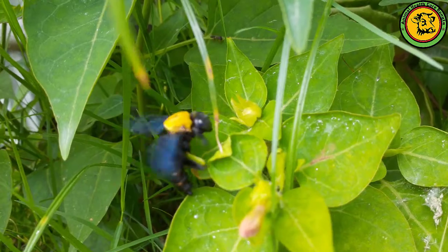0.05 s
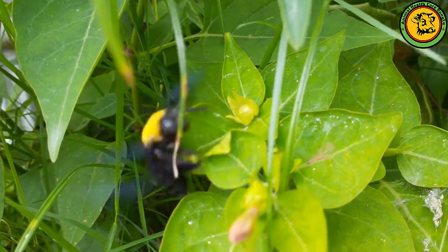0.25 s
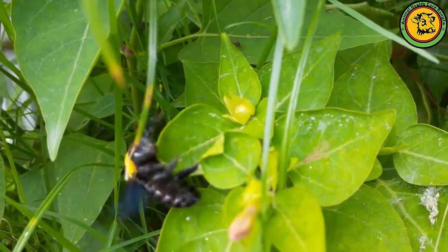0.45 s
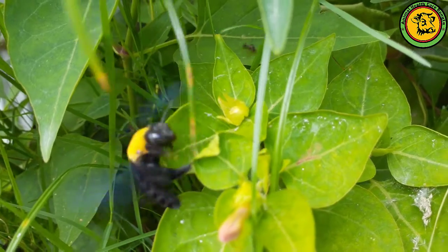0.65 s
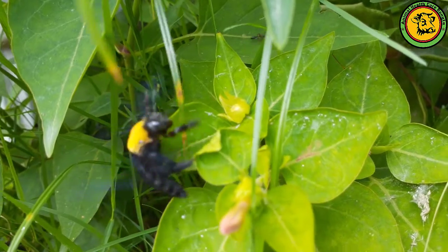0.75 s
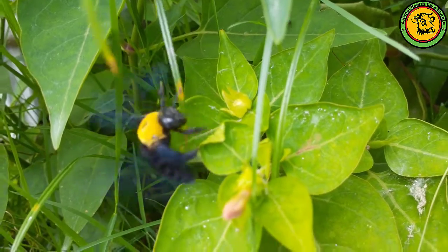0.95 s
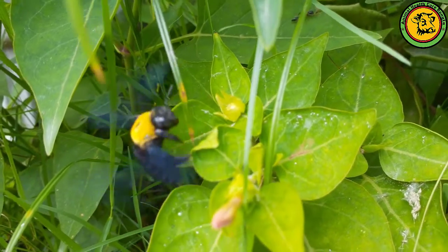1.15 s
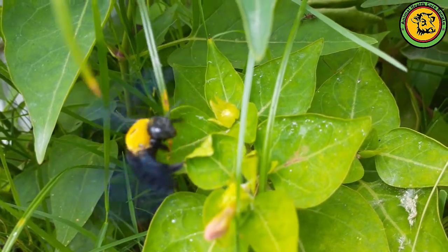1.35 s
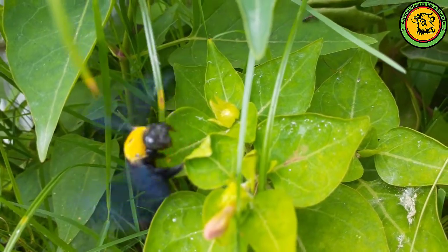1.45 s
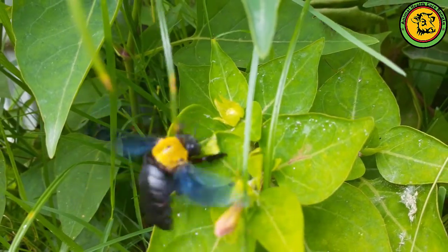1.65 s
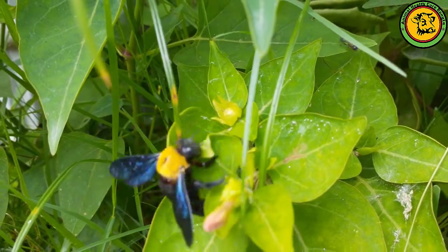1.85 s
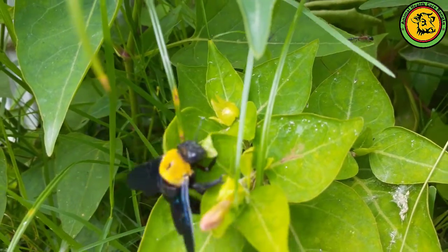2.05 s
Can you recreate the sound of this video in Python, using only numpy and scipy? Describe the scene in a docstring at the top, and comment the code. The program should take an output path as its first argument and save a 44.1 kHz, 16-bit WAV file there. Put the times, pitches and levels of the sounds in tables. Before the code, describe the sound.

Low, raspy buzzing of a big bee among leaves, ending abruptly, with faint distant birdsong.

```python
"""Faint outdoor air and a thin insect hiss run throughout; a far bird repeats a two-part call for 1 s,
the first with a soft raspy burst. At 0.17 s a large bee, very close, starts beating its wings.
Each wingbeat gives a low, reedy hum and dry rasps. The wing tips clatter against a leaf,
lightly at first, harder near 0.7 s and 1.75 s. At 1.85 s the bee settles; one tiny tick follows."""
import sys
import numpy as np
from scipy import signal
from scipy.fft import rfft, irfft
from scipy.io import wavfile

SR = 44100
rng = np.random.default_rng(int(sys.argv[2]) if len(sys.argv) > 2 else 0)


def pcm_store(signal):
    """Save signal as 16-bit PCM."""
    levels = np.round(np.clip(np.atleast_2d(signal), -1, 1) * 32767)
    wavfile.write(sys.argv[1], SR, levels.astype(np.int16).T)


N = 92610
T = np.arange(N) / SR
EDGE_HZ = 15750
STEADY_HZ = 93.35  # a slower beat stumbles and loses overtones
FLIP_CYCLES = 0.24  # place of the wing flip in the beat

# wingbeat: (time [s], rate [Hz])
BEAT = [(.19,83.4),(.25,87.6),(.335,94.7),(.39,95.6),(.445,98.7),(.5,102.1),(.57,89.6),(.64,95.7),(.72,95.4),(.88,98.8),(1.02,96.8),(1.23,99.4),(1.3,96.1),(1.56,97),(1.65,91.7),(1.725,99.3),(1.775,86.5),(1.84,87.9)]
# hum: (time [s], level of harmonics 1-3 [dB], level of the overtones above [dB])
HUM = [(.19,-45.5,-51),(.226,-36,-38.5),(.27,-36,-45.5),(.32,-32,-42.5),(.432,-27,-42.5),(.516,-30.5,-36),(.576,-34.5,-44.5),(.634,-31.5,-41),(.772,-28.5,-38.5),(1.08,-28,-40.5),(1.16,-30,-42.5),(1.24,-27.5,-39.5),(1.564,-27,-39),(1.63,-29,-39.5),(1.728,-27,-40.5),(1.752,-36.5,-40),(1.784,-30,-36),(1.84,-36.5,-43)]
# wingbeat harmonics from the first up: (left gain [dB], right gain [dB])
HARMONICS = [(-9,-8.5),(3,-12.5),(-17,-25),(-1,-5),(2.5,-11.5),(2,-17),(-10,-20.5),(-12,-38),(-17.5,-38),(-15,-42),(-19,-37),(-40,-46)]


def amp(db):
    """Decibels to gain."""
    return 10 ** (np.asarray(db) / 20)


def unit(x):
    """Scale to rms 1."""
    return x / np.sqrt(np.mean(x ** 2) + 1e-20)


def curve(rows, col=1):
    """Table column, linearly interpolated in time."""
    rows = np.array(rows)
    return np.interp(T, rows[:, 0], rows[:, col])


def pan(db):
    """Stereo gains for a left-minus-right level."""
    return unit(amp([[db / 2], [-db / 2]]))


def colour(x, spectrum):
    """Filter by (frequency [Hz], gain [dB]) points; rms 1."""
    hz, db = np.transpose(spectrum)
    f = np.fft.rfftfreq(N, 1 / SR)
    gain = amp(np.interp(np.log(f + 1), np.log(hz), db)) * (f < EDGE_HZ)
    return unit(irfft(rfft(x) * gain, N))


def noise(spectrum):
    """Coloured noise, independent per channel."""
    return colour(rng.standard_normal((2, N)), spectrum)


def drift(rate_hz):
    """Low-passed random wander; rms 1."""
    f = np.fft.rfftfreq(N, 1 / SR)
    return unit(irfft(rfft(rng.standard_normal(N)) * np.exp(-(f / rate_hz) ** 2) * (f > 0), N))


def scatter(x, t60_s):
    """Diffuse reflections from foliage."""
    t = T[:SR // 2]
    tail = rng.standard_normal((2, len(t))) * np.exp(-np.log(1000) * t / t60_s)
    return signal.fftconvolve(x, tail / np.linalg.norm(tail[0]), axes=1)[:, :N]


def outdoors():
    """Low rumble of air, faint hiss and a narrow, slowly rising band of distant insects."""
    # open-air spectra: (frequency [Hz], gain [dB])
    rumble_spectrum = [(20,-38),(45,-12),(85,1),(140,-9),(300,-16.5),(600,-22.5),(1100,-42.5),(3000,-65)]
    hiss_spectrum = [(300,-7),(1100,3),(2200,1),(3400,-4),(4500,-1.5),(8000,-2.5),(12000,-2),(15500,-21)]
    # background: (time [s], rumble level [dB], insect level [dB])
    levels = [(0,-50.5,-58),(.12,-51.5,-57),(1.85,-41.5,-58),(1.95,-46.5,-60),(2.04,-47.5,-60),(2.1,-49,-47)]
    insect_hz, rise_hz_per_s, width_hz = 9340, 330, 710
    rumble = noise(rumble_spectrum)
    rumble = unit(rumble + 0.44 * rumble[::-1]) * amp(curve(levels))  # channels partly correlated
    carrier = np.sin(2 * np.pi * np.cumsum(insect_hz + rise_hz_per_s * T) / SR)
    insects = unit(carrier * np.array([drift(width_hz), drift(width_hz)])) * amp(curve(levels, col=2))
    hiss = noise(hiss_spectrum) * amp(-54)
    return rumble + hiss * pan(-3.5) + insects * pan(-1)


def far_birds():
    """Thin ringing wash of distant birdsong, dying away."""
    # birdsong band: (frequency [Hz], gain [dB])
    spectrum = [(2200,-17),(2860,-1.5),(3250,-13),(3540,4.5),(4000,-8),(5600,-26)]
    start_db, fade_db_per_s = -49, 9
    return noise(spectrum) * amp(start_db - fade_db_per_s * T)


def bird_tone(hz, rough, partials_db=(0,)):
    """Harmonic tone with random pitch deviation of relative rms `rough`."""
    phase = 2 * np.pi * np.cumsum(hz * (1 + rough * drift(371))) / SR
    return np.sqrt(2) * sum(amp(db) * np.sin(k * phase) for k, db in enumerate(partials_db, 1))


def bird():
    """Nasal notes alternating with falling chirps and, once, a whistle; garden echo."""
    # nasal notes: (start [s], length [s], level [dB], tilt [dB per partial])
    notes = [(0,0.031,-47.5,6),(.195,0.046,-44.5,4),(.413,0.071,-41,3.5),(.625,0.044,-39,-3),(.82,0.048,-42,-3),(.95,0.065,-42,-9)]
    # falling chirps: (start [s], length [s], from [Hz], to [Hz], level [dB])
    chirps = [(0.032,0.043,3080,1490,-43),(0.236,0.038,2980,1220,-40),(0.468,.032,2960,1120,-42),(0.674,0.058,3010,1740,-38.5)]
    # clear whistle: (time [s], pitch [Hz], level [dB])
    whistle = [(.866,3100,-36),(.876,2860,-38.5),(.895,2825,-34.5),(.943,2774,-40.5),(.954,2670,-38)]
    note_hz = 1630
    whistling = (T > whistle[0][0]) * (T < whistle[-1][0])
    song = bird_tone(curve(whistle), rough=0.0052) * amp(curve(whistle, col=2)) * whistling
    for start_s, length_s, db, tilt_db in notes:
        partials_db = np.array([-2, -6, -9]) + tilt_db * np.arange(3)
        arch = abs(np.sin(np.pi * np.clip((T - start_s) / length_s, 0, 1)))
        hz = note_hz * (1 + 0.05 * arch)
        song += amp(db) * arch * bird_tone(hz, rough=0.022, partials_db=partials_db)
    for start_s, length_s, from_hz, to_hz, db in chirps:
        progress = np.clip((T - start_s) / length_s, 0, 1)
        hz = from_hz + (to_hz - from_hz) * progress ** 1.7
        song += amp(db) * abs(np.sin(np.pi * progress ** 0.56)) * bird_tone(hz, rough=0.08)
    song = song * pan(-1)
    return song + amp(-6) * scatter(song, t60_s=0.55)


def soft_rasps():
    """A soft, raspy burst near 3.4 kHz with the bird's first call; one tiny tick after the bee stops."""
    # bursts: (centre [s], level [dB], Gaussian width [s])
    bursts = [(0.031,-43,0.027),(2.088,-57,0.0035)]
    # burst spectrum: (frequency [Hz], gain [dB])
    spectrum = [(1000,-10),(3400,11.5),(6000,-2.5),(8500,-0.5),(11000,-12),(15000,-25)]
    envelope = sum(amp(db) * np.exp(-((T - at_s) / width_s) ** 2 / 2) for at_s, db, width_s in bursts)
    return noise(spectrum) * envelope * amp(0.83 * drift(400)) * pan(-10)


def leaf_strikes():
    """Each blow of a wing tip on a leaf: a bright snap with a duller knock."""
    # blows: (time [s], level [dB], left minus right [dB], decay [s])
    blows = [(.1978,-18,-5,0.00034),(0.259,-22,1,.0004),(.276,-23,4,.0004),(0.288,-22.5,8,.0005),(0.299,-20,-5,.0007),(0.687,-19,-6,0.0014),(0.7004,-16,-2,0.0011),(0.709,-18,1,0.001),(0.72,-12,-7,0.00072),(0.73,-14.5,-2,0.00087),(0.741,-17,-11,0.0012),(0.7537,-13,-3,0.00079),(0.766,-18,-1,0.00083),(0.771,-18,-8,.0007),(1.707,-17,2.5,0.0014),(1.7176,-17,5,.0006),(1.7283,-15,21,0.00069),(1.738,-15.5,8,0.0012),(1.7476,-7,3,0.00083),(1.7584,-12.5,-3,.0011),(1.762,-13,5,0.00052),(1.7713,-14.5,21,.001),(1.783,-17.5,-1,.0012),(1.8328,-15,-4,0.001)]
    # impact spectra: (frequency [Hz], gain [dB])
    snap_spectrum = [(500,-12),(2500,-35),(4000,-8.5),(6500,-3),(9000,2),(12000,4),(15500,2)]
    knock_spectrum = [(100,-4),(500,-1),(1400,2),(3000,-4),(6000,0.5),(15000,-40)]
    rise_per_decay = 0.57
    impact = noise(snap_spectrum) + amp(-12.5) * noise(knock_spectrum)
    out = np.zeros((2, N))
    for at_s, db, pan_db, decay_s in blows:
        age = (T - at_s) / decay_s
        envelope = np.exp(-np.maximum(age, -age / rise_per_decay) ** 1.42 / 2)
        out += amp(db) * pan(pan_db) * envelope * impact
    return out


def wing_rasp(cycles):
    """Crackly hiss flaring at set places in each wingbeat, no two beats alike."""
    # flares in one beat: (place [cycles], width [cycles], left gain [dB], right gain [dB])
    flares = [(.22,0.012,11,-5),(.33,0.0096,9,-3),(0.17,0.14,3,-0.5),(0.75,0.013,-1,3),(.78,0.1,1,7)]
    # rasp spectrum: (frequency [Hz], gain [dB])
    spectrum = [(300,-1),(800,-12),(1200,-15.5),(1800,-11.5),(2400,-15.5),(3300,-9),(4200,-9),(5500,-7.5),(7500,-6.5),(9500,-2.5),(12500,0.5),(14000,-3),(15500,-2)]
    # rasp envelope: (time [s], level [dB])
    levels = [(.19,-38.5),(.207,-35.5),(.215,-32.5),(.255,-29),(.32,-32),(.44,-30),(.52,-28),(.59,-36.5),(.628,-32),(.65,-27),(.75,-27),(.84,-28.5),(1.1,-29.5),(1.23,-28.5),(1.33,-31),(1.55,-28.5),(1.63,-30),(1.76,-26.5),(1.81,-33.5),(1.838,-26.5)]
    jitter_cycles, spread_db, crackle_db = 0.005, 2.2, 2.6
    beat_index, power = cycles.astype(int), np.ones((2, N))
    for place, width, left_db, right_db in flares:
        size, shift = rng.standard_normal((512, 2))[beat_index].T  # one draw per beat
        flare = np.exp(-((cycles % 1 - place - jitter_cycles * shift) / width) ** 2 / 2)
        power += flare * amp(np.array([[left_db], [right_db]]) + spread_db * size) ** 2
    grains = rng.standard_normal((2, N)) * amp(crackle_db * drift(2300))
    return colour(grains * np.sqrt(power), spectrum) * amp(curve(levels))


def wing_flip(cycles):
    """The snap of each flip extends the harmonics into the treble: a reedy buzz."""
    # high harmonics: (frequency [Hz], gain [dB])
    spectrum = [(1280,3.5),(1500,-11),(1900,3),(2300,-9.5)]
    snap = sum(np.cos(2 * np.pi * k * (cycles - FLIP_CYCLES)) for k in range(len(HARMONICS) + 1, 44))
    return colour(snap, spectrum) * amp(curve(HUM, col=2) - 11) * pan(9)


def wing_hum(cycles):
    """Wingbeat harmonics and draught; up and down strokes give a strong second harmonic."""
    # stroke asymmetry: (time [s], left gain of harmonics 1 and 3 [dB])
    asymmetry = [(.2,-6),(.35,4.5),(.48,8),(.75,5.5),(.9,-3.5),(1.2,-14),(1.3,-1.5),(1.62,-8.5),(1.76,4.5),(1.84,-4)]
    # air stirred by the wings: (frequency [Hz], gain [dB])
    draught_spectrum = [(20,-33),(45,-22),(75,3),(130,-2),(250,-4.5),(340,-8.5),(520,-8),(700,-11.5),(1100,-27),(2500,-25)]
    waver_db, flutter_db, slow_loss_db_per_hz = 1.1, 0.5, 0.5
    low_db = curve(HUM)
    odd_db = curve(asymmetry) * np.array([[1], [0]])
    high_db = curve(HUM, col=2) - slow_loss_db_per_hz * np.maximum(STEADY_HZ - curve(BEAT), 0)
    out = noise(draught_spectrum) * amp(low_db - 9)
    for k, sides_db in enumerate(HARMONICS, 1):
        level_db = low_db + odd_db * (k % 2) if k <= 3 else high_db
        wander_db = (waver_db * drift(19) + flutter_db * drift(44)) * (k > 2)
        wave = np.sqrt(2) * np.cos(2 * np.pi * k * (cycles - FLIP_CYCLES * (k > 2)))
        out += amp(sides_db)[:, None] * amp(level_db + wander_db) * wave
    return out


def bee():
    """One wingbeat drives hum, flip and rasp; near leaves scatter the treble, the garden adds a tail."""
    start_s, stop_s, attack_s, release_s = 0.1715, 1.846, 0.026, 0.0027
    start_cycles, jitter_cycles, stumble_cycles_per_hz = 0.17, 0.007, 0.0088
    beat_hz = curve(BEAT)
    stumble = stumble_cycles_per_hz * np.maximum(STEADY_HZ - beat_hz, 0) * drift(75)
    cycles = start_cycles + np.cumsum(beat_hz) / SR + jitter_cycles * drift(18) + stumble
    beating = np.clip((T - start_s) / attack_s, 0, 1) * np.clip((stop_s - T) / release_s, 0, 1)
    treble = beating * (wing_rasp(cycles) + wing_flip(cycles)) + leaf_strikes()
    buzz = beating * wing_hum(cycles) + treble
    return buzz + amp(-14) * scatter(treble, t60_s=0.025) + amp(-18) * scatter(buzz, t60_s=0.2)


def scene():
    """Bee in front, birds and garden behind."""
    return bee() + soft_rasps() + bird() + far_birds() + outdoors()


def record(dry):
    """Soft peak limiter, then low-pass."""
    ceiling = 0.78
    limited = dry / (1 + (dry / ceiling) ** 6) ** (1 / 6)
    lowpass = signal.firwin(511, EDGE_HZ, window=("kaiser", 9), fs=SR)
    return signal.oaconvolve(limited, lowpass[None], "same")


dry = scene()
out = record(dry)
pcm_store(out)
```